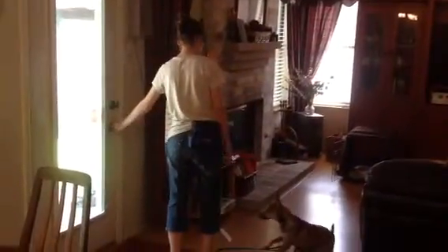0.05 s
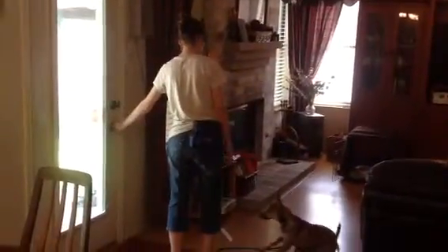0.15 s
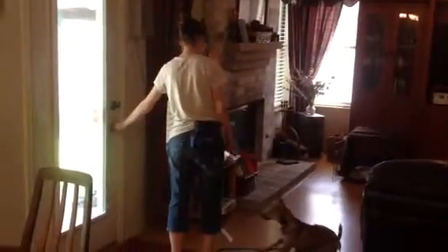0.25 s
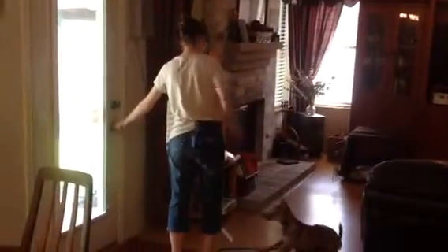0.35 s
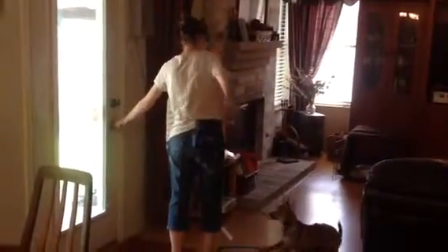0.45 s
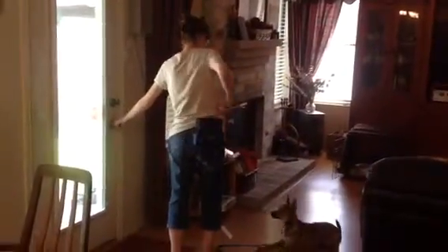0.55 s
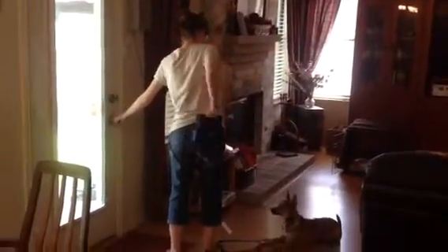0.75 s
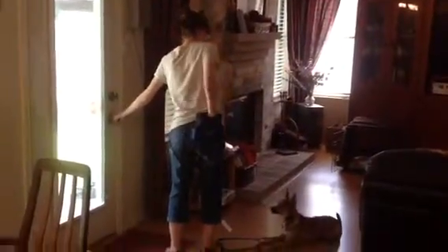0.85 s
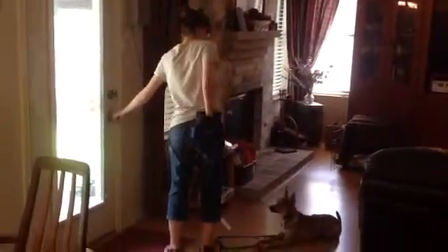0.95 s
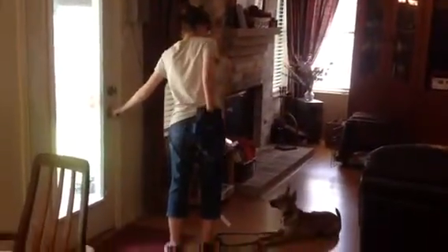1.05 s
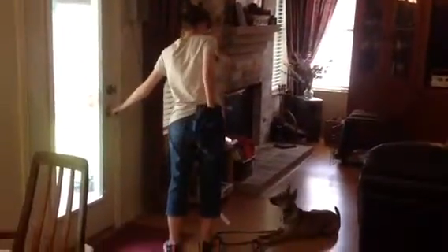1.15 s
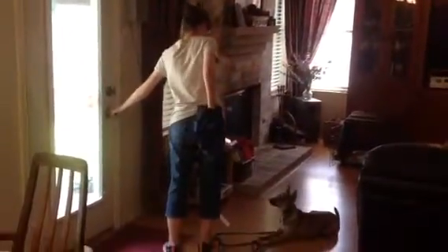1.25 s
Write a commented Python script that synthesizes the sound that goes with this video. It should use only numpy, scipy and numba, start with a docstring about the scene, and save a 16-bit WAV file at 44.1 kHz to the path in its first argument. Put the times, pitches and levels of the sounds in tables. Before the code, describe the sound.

A dog clicker snaps twice in quick succession, the second click a little lower, both ringing briefly in a quiet living room. Then come a faint tap and softly rustling clothes, over low room noise.

```python
"""Over the low noise of a quiet living room with a hard floor, a faint hiss dies away.
A dog-training clicker is pressed: its steel tongue buckles and rings high. Let go, it springs back
with a lower ring, and a dull thump sounds. Near surfaces echo each snap and the room reverberates.
A faint tap follows, and last a soft rustle of clothing as someone shifts their stance."""
import sys
import numpy as np
from scipy import signal
from scipy.fft import rfft, irfft
from scipy.io import wavfile
from numba import njit

SR = 44100
rng = np.random.default_rng(int(sys.argv[2]) if len(sys.argv) > 2 else 0)


def waveform_to_disk(signal):
    """Save audio, clipped to [-1, 1], as 16-bit WAV at the path in sys.argv[1]."""
    frames = np.transpose(np.atleast_2d(signal))
    scaled = np.clip(frames, -1, 1) * 32767
    samples = np.round(scaled).astype(np.int16)
    wavfile.write(sys.argv[1], SR, samples)


N = 57330

# Spectra of the room noise and the opening hiss. Each row: frequency in Hz, relative density in dB.
ROOM_NOISE_SPECTRUM = [(25, -50), (60, -39), (100, -12), (135, -4.5), (205, 1), (270, -7.5), (360, -2.5),
                       (500, -8.5), (1000, -12.5), (2000, -20), (3600, -20), (5500, -29), (9000, -40),
                       (12000, -42), (15000, -41)]
HISS_SPECTRUM = [(1200, -12), (2800, -1), (3600, 7.5), (4600, -0.5), (5500, 2), (7500, -9), (10000, -32)]

# Gains of each impact in dB: overall, crack, reverberation, and the crack's extra gain in the room.
PRESS = {"db": -1.5, "crack_db": -18, "room_db": -1, "spray_db": 4}
RELEASE = {"db": -4.5, "crack_db": -23, "room_db": -3, "spray_db": 2}
TAP = {"db": -32.5, "crack_db": -26, "room_db": -3, "spray_db": 10}
# Modes of the tongue bent in, the tongue sprung back and the tapped object.
# Each row: frequency in Hz, relative level in dB, time to decay by 60 dB in seconds.
PRESS_MODES = [(1880, -15, 0.0091), (2540, -22, 0.011), (3000, -12.5, 0.009), (4280, -17, 0.012),
               (4690, -3.5, .010), (5010, -0.5, 0.0084), (5155, -19.5, 0.0058), (5400, -22, 0.0036),
               (7870, -21, 0.01)]
RELEASE_MODES = [(2000, -10.5, 0.0049), (2298, -7, 0.0084), (2563, -2, 0.013), (3535, -8, 0.024),
                 (3700, -3, 0.0097), (4090, -5.5, 0.012), (4444, -10.5, 0.011), (5390, -11, 0.015),
                 (7480, -5.5, 0.0022), (9800, -13, 0.0086), (10400, -27, 0.0029)]
TAP_MODES = [(620, -9.5, 0.015), (2000, -8, 0.0091), (3280, -5.5, .016), (3520, -8.5, 0.018),
             (3870, 1.5, 0.0081), (4340, -5, 0.0049)]

# Reflections from the body, floor and near walls. Each row: delay in seconds, gain in dB.
ECHOES = [(.0021, -4), (.0043, -6), (.0080, -11), (.0100, -12), (.0145, -12), (.0202, -7)]
# Decay of the room. Each row: frequency in Hz, reverberation time in seconds.
ROOM_T60 = [(300, .5), (1400, 0.62), (2700, 0.54), (5000, 0.51), (8000, 0.45), (14000, 0.3)]
# Spectrum of the reverberant crack. Each row: frequency in Hz, gain in dB.
CRACK_SPECTRUM = [(1500, 5.5), (3500, 8.5), (5500, -12), (6700, -23), (7400, -6), (8100, 7), (9000, 0),
                  (10000, 5), (11300, 0), (12700, 6.5), (13700, 1.5), (14400, -9)]

# Envelopes of the cloth's swish and its finer hiss. Each row: time in seconds, gain in dB.
SWISH_ENVELOPE = [(.86, -71), (.93, -55), (.96, -53.5), (1.01, -46), (1.04, -50.5), (1.075, -50),
                  (1.13, -53.5), (1.19, -63), (1.3, -68)]
FABRIC_ENVELOPE = [(.70, -65.5), (.75, -64), (.88, -59), (1.0, -60), (1.1, -61.5), (1.2, -65), (1.3, -63.5)]
# Spectra of the same two sounds. Each row: frequency in Hz, relative density in dB.
SWISH_SPECTRUM = [(60, -36), (200, -20), (400, -8.5), (520, -3.5), (720, -4.5), (950, -2.5), (1400, -6.5),
                  (2400, -9.5), (3500, -10.5), (6000, -18), (9000, -26.5), (15000, -45)]
FABRIC_SPECTRUM = [(1500, 3), (4000, -4), (6500, 4), (9000, -3), (11500, 1), (15000, -6.5)]

PRESS_S, RELEASE_S, TAP_S = 0.2012, 0.3412, 0.7330
BIN_HZ = np.fft.rfftfreq(N, 1 / SR)


def undb(db):
    """Amplitude grows tenfold for every 20 dB."""
    return 10 ** (np.asarray(db) / 20)


def unit(x):
    """Normalisation to an rms of 1."""
    return x / np.sqrt(np.mean(x ** 2))


def fade(t, t60):
    """Exponential damping by 60 dB in t60 seconds."""
    return np.exp(-np.log(1000) * t / t60)


def per_bin(points):
    """Interpolation of a table at every spectral bin, on a log-frequency axis."""
    hz, values = np.array(points).T
    return np.interp(np.log(np.maximum(BIN_HZ, 1)), np.log(hz), values)


def colour(x, spectrum):
    """Filtering as multiplication in the frequency domain."""
    return irfft(rfft(x) * undb(per_bin(spectrum)), N)


def butterworth(x, hz, kind, order):
    """A high- or low-pass filter with a maximally flat passband."""
    return signal.sosfilt(signal.butter(order, hz, kind, fs=SR, output="sos"), x)


def grainy(grain):
    """Log-normal modulation turns noise into dense small clicks; rms 1."""
    return unit(rng.standard_normal(N) * np.exp(grain * rng.standard_normal(N)))


def resonance(centre_hz, width_hz):
    """A resonance driven by noise gives a narrow, wavering band; rms 1."""
    response = 1 / (1 + (2 * (BIN_HZ - centre_hz) / width_hz) ** 2)
    return unit(irfft(rfft(rng.standard_normal(N)) * response, N))


def room_noise():
    """Stationary noise: a broad low band and a narrow-band drone."""
    broad = unit(colour(rng.standard_normal(N), ROOM_NOISE_SPECTRUM))
    return undb(-53.5) * broad + undb(-56.5) * resonance(centre_hz=212.8, width_hz=56)


def hiss(t):
    """Faint treble noise decays exponentially from the start."""
    treble = unit(colour(rng.standard_normal(N), HISS_SPECTRUM))
    return undb(-51.5) * treble * fade(t, t60=0.44)


def impact(t, start_s, modes, gains, paths):
    """An impulse excites damped modes and a brief crack; convolution carries both through the room."""
    near, ring_tail, crack_tail = paths
    swing_s = 0.00019  # time constant of the rise to full swing
    ring = sum(undb(db) * np.sin(2 * np.pi * hz * t) * fade(t, t60) for hz, db, t60 in modes)
    ring *= 1 - np.exp(-t / swing_s)
    crack = undb(gains["crack_db"]) * rng.standard_normal(N) * fade(t, t60=0.011)
    early = signal.fftconvolve(ring + crack, near)[:N]
    # The crack is so short that it excites the room like an impulse of equal energy.
    spray = colour(crack_tail, CRACK_SPECTRUM) * np.sqrt(np.sum(crack ** 2))
    diffuse = signal.fftconvolve(ring, ring_tail)[:N] + undb(gains["spray_db"]) * spray
    sound = undb(gains["db"]) * (early + undb(gains["room_db"]) * diffuse)
    return delay(sound, start_s)


def delay(x, seconds):
    """A shift in time brings a sound to its moment."""
    return np.concatenate([np.zeros(int(seconds * SR)), x])[:N]


def clicker(t, paths):
    """Snap-through buckling drives the tongue in and back; the small case radiates no bass from it."""
    press = impact(t, PRESS_S, PRESS_MODES, PRESS, paths)
    release = impact(t, RELEASE_S, RELEASE_MODES, RELEASE, paths)
    return butterworth(press + release, 1401, "high", order=7)


def early_reflections():
    """Impulse response of the direct path and near surfaces, whose absorption dulls the echoes."""
    response = np.zeros(int(SR / 20))
    for seconds, db in ECHOES:
        response[int(seconds * SR)] += undb(db)
    response = butterworth(response, 7500, "low", order=2)
    response[0] = 1
    return response


def reverberation(t):
    """A diffuse field builds from the first echo on and decays soonest in the treble."""
    scatter = rfft(grainy(0.4))
    tail = 0
    for band_hz, t60 in ROOM_T60:
        band = per_bin([(hz, float(hz == band_hz)) for hz, _ in ROOM_T60])
        tail = tail + irfft(scatter * band, N) * fade(t, t60)
    build_s, first_echo_s = 0.035, ECHOES[0][0]
    tail *= (1 - 0.14 * np.exp(-(t / build_s) ** 2)) * (t > first_echo_s)
    return tail * undb(8) / np.sqrt(np.sum(tail ** 2))


def thump(t):
    """A dull, heavily damped low thump sounds with the release snap."""
    pulse = butterworth(fade(t, t60=0.0013), 920, "low", order=1)
    return delay(undb(-21.5) * pulse, RELEASE_S)


def tap(t, paths):
    """A small hard object, touched once, rings in free vibration."""
    return butterworth(impact(t, TAP_S, TAP_MODES, TAP, paths), 180, "high", order=3)


def rustle(t):
    """Friction makes cloth swish and hiss, and a shifting foot excites a hollow resonance of the boards."""
    swish = unit(colour(grainy(0.38), SWISH_SPECTRUM))
    scuff = undb(-3) * resonance(centre_hz=552, width_hz=89)
    fabric = unit(colour(grainy(0.38), FABRIC_SPECTRUM))
    swish_gain = undb(np.interp(t, *np.array(SWISH_ENVELOPE).T))
    fabric_gain = undb(np.interp(t, *np.array(FABRIC_ENVELOPE).T))
    return (swish + scuff) * swish_gain + fabric * fabric_gain


def scene():
    """The sources superpose at one microphone; ring and crack scatter along different paths."""
    t = np.arange(N) / SR
    paths = early_reflections(), reverberation(t), reverberation(t)
    return (clicker(t, paths) + thump(t) + tap(t, paths) + rustle(t) + hiss(t) + room_noise())[None]


@njit
def follow(x, attack_s, release_s):
    """Rectifying and smoothing gives an envelope, with separate time constants for rise and fall."""
    envelope, level = np.empty(len(x)), 0.
    for i in range(len(x)):
        lag_s = attack_s if abs(x[i]) > level else release_s
        level += (abs(x[i]) - level) / (lag_s * SR)
        envelope[i] = level
    return envelope


def record(dry):
    """A limiter ducks after each snap, saturation rounds the remaining peaks, a low-pass cuts the top."""
    threshold_db, ceiling, top_hz = -9, 0.8, 15200
    envelope = follow(dry[0], attack_s=0.00045, release_s=0.075)
    limited = dry / np.maximum(envelope / undb(threshold_db), 1)
    rounded = limited / (1 + (limited / ceiling) ** 4) ** 0.25
    return signal.sosfilt(signal.ellip(8, 0.2, 70, top_hz, fs=SR, output="sos"), rounded)


dry = scene()
out = record(dry)
waveform_to_disk(out)
```